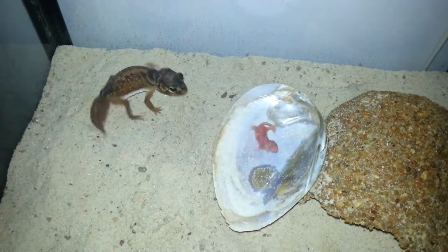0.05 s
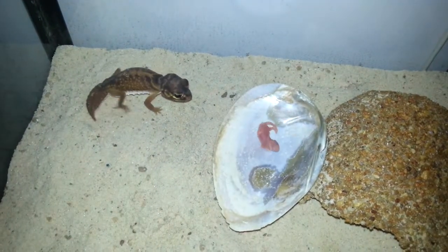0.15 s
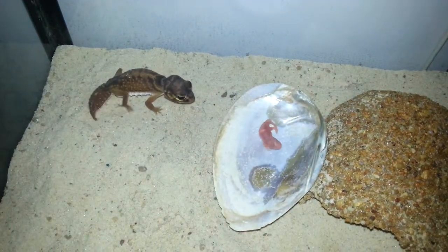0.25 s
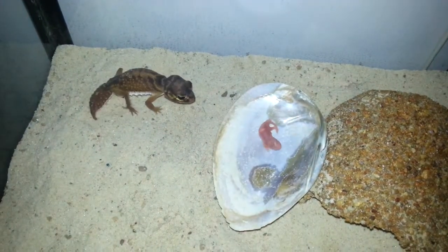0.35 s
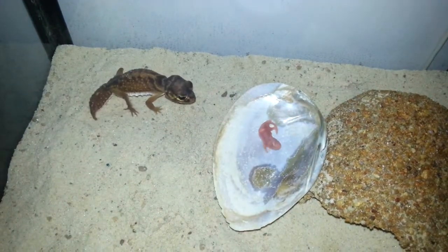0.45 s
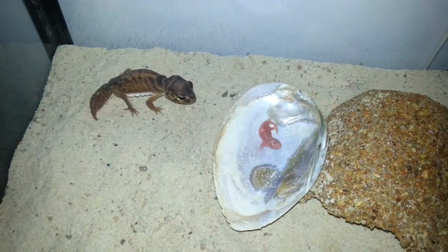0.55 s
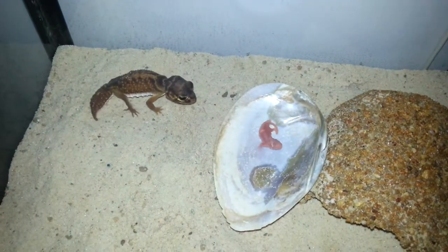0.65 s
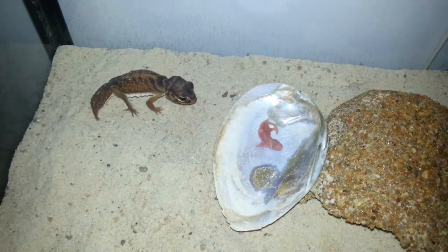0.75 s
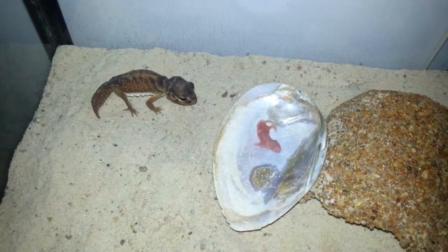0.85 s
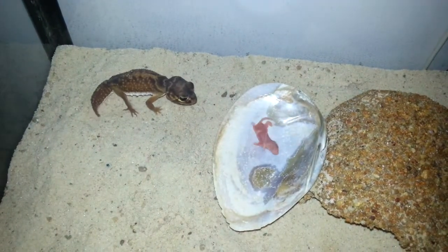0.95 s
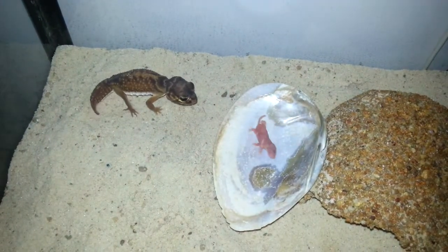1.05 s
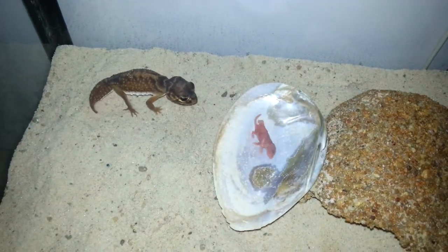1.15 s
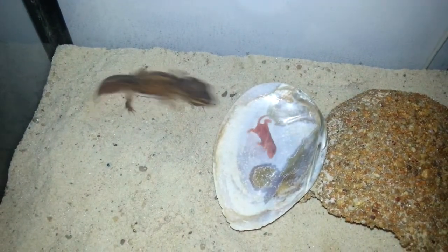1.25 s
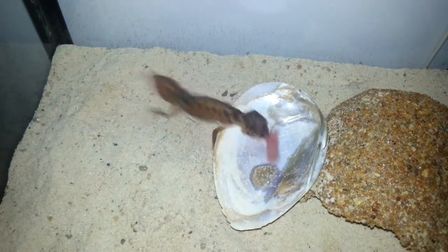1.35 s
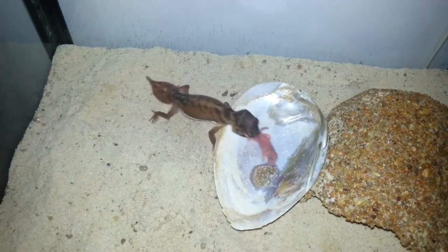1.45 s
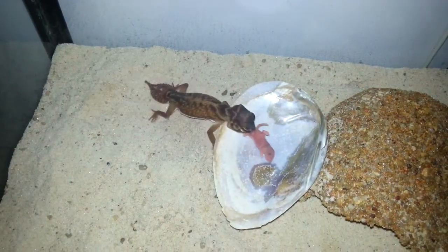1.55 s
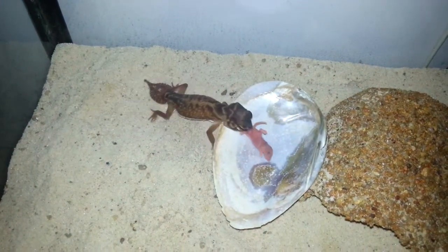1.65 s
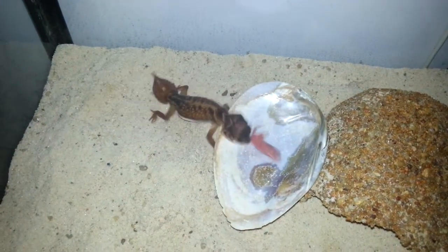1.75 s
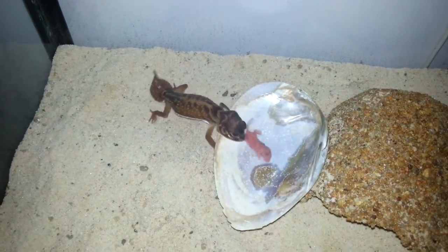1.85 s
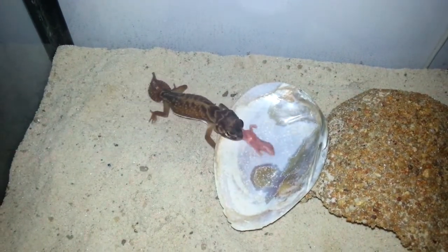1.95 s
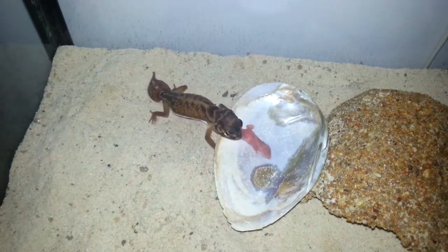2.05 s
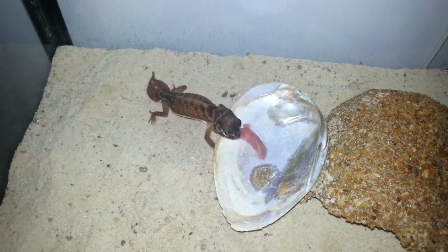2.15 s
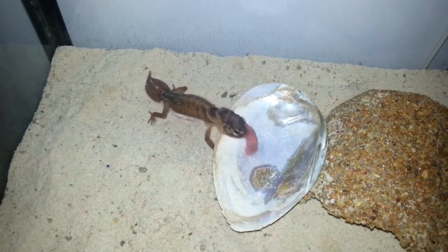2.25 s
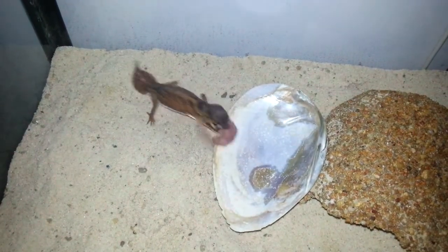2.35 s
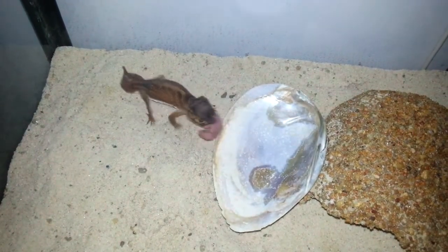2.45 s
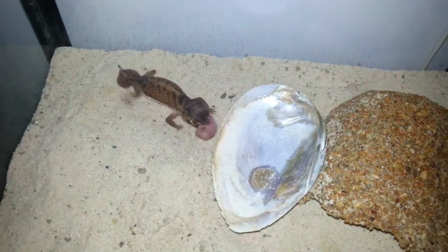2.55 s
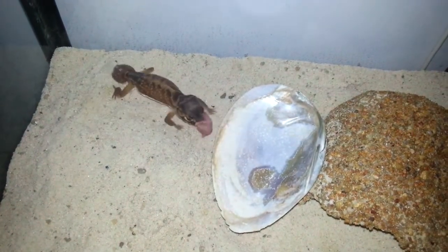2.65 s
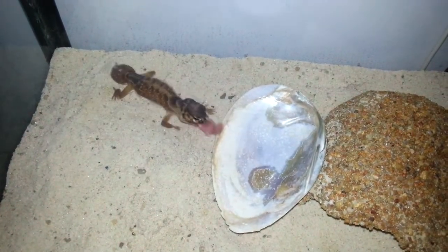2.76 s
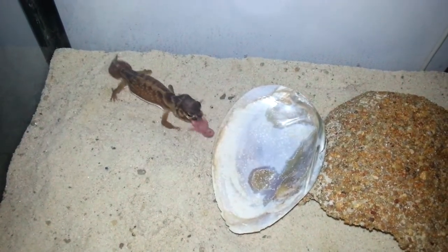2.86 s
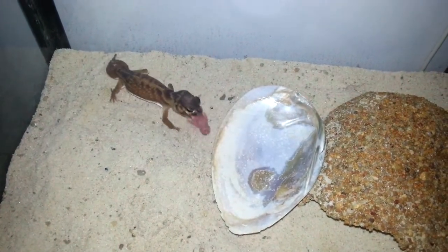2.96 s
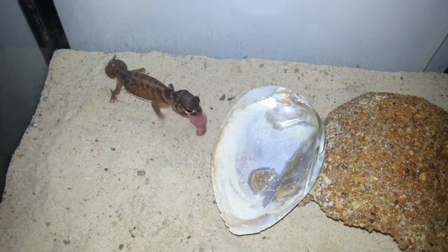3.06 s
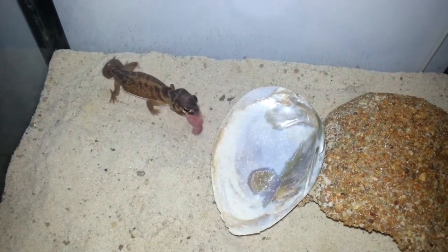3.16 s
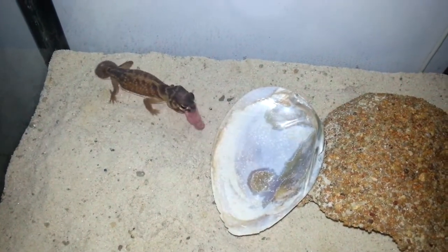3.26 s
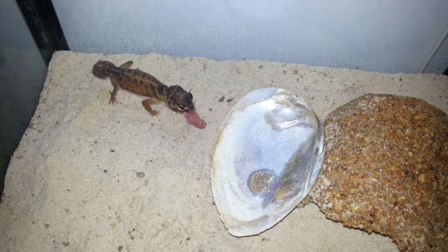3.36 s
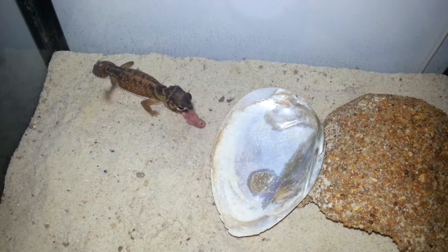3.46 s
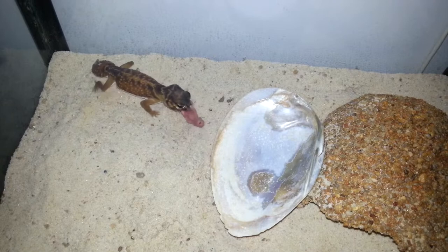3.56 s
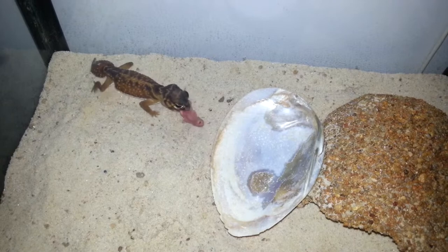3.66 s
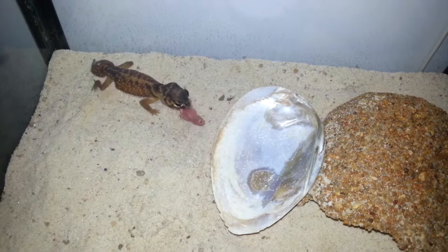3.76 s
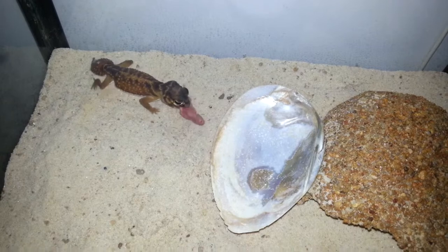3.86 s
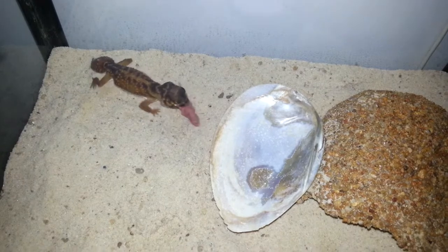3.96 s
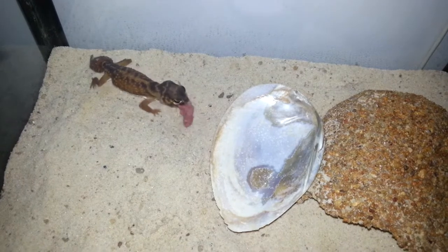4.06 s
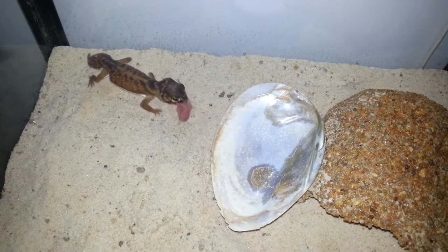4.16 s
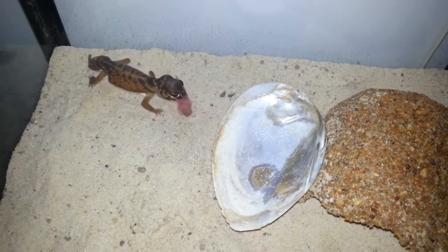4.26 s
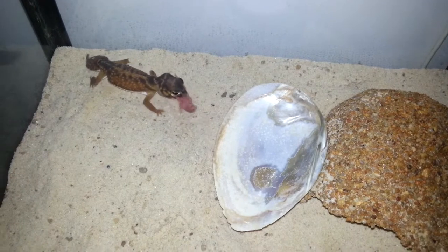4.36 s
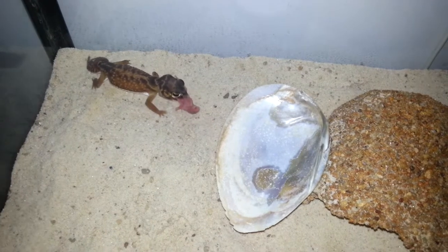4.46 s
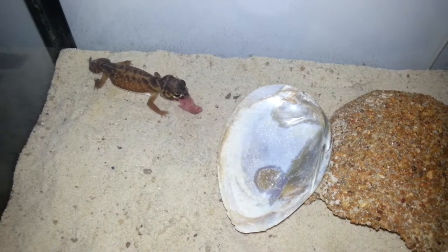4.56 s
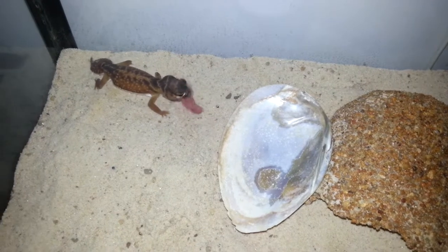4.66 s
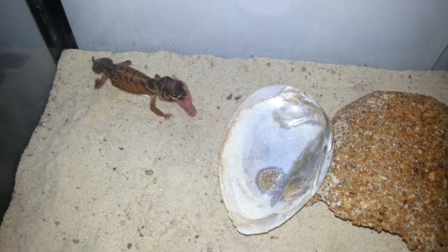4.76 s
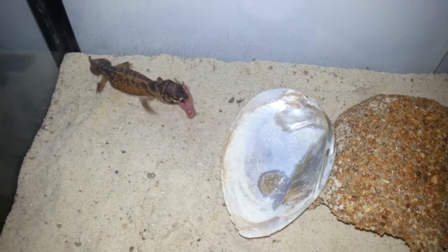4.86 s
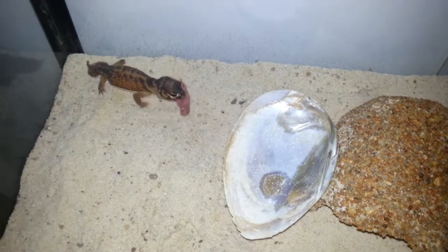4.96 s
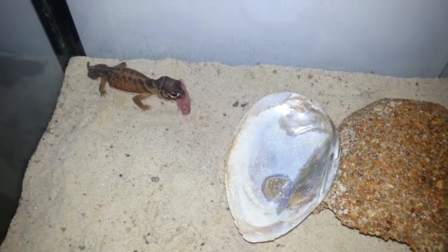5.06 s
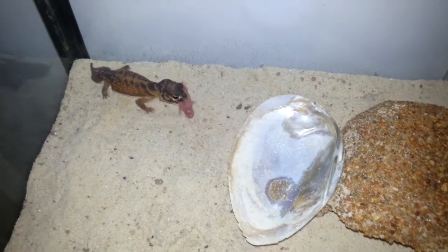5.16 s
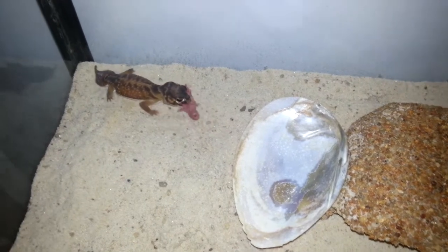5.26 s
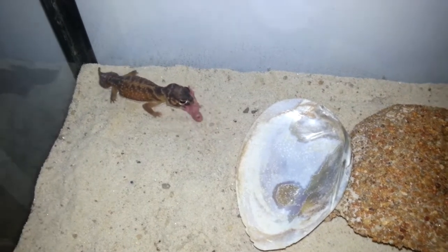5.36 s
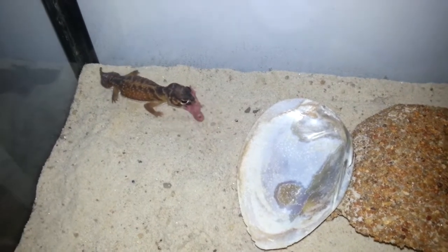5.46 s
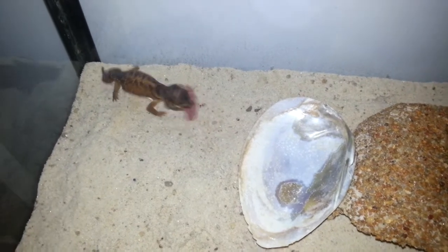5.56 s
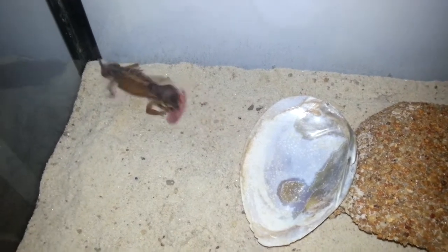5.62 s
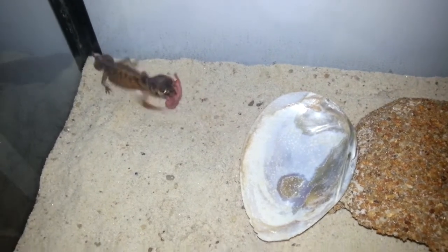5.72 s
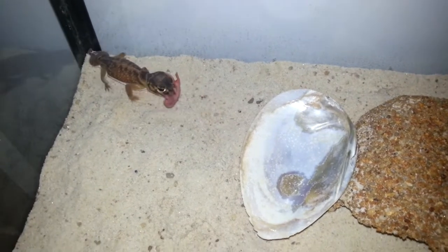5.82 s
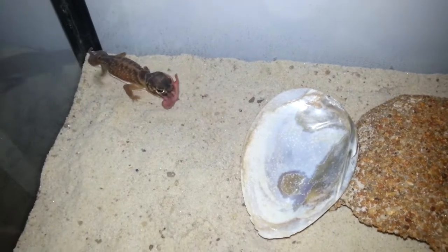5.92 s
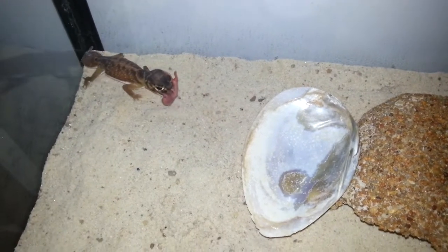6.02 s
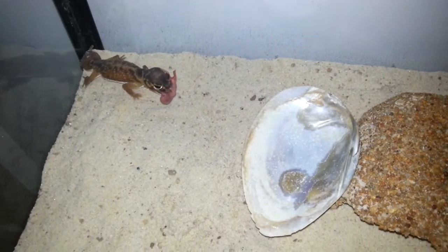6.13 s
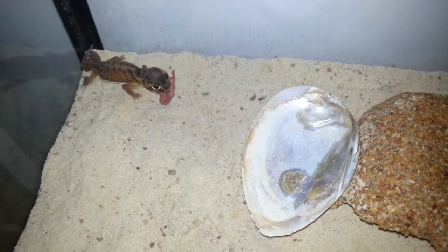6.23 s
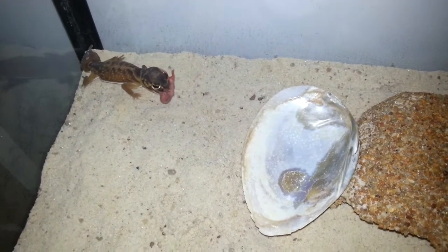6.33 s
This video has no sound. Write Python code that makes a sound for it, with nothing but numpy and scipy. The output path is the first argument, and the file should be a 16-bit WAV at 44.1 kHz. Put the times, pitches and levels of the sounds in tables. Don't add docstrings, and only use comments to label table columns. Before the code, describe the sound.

Hard little taps on a shell and soft floor thumps, then short, piercing, arching squeaks with croaky rasps in a quiet glass tank.

```python
import sys
import numpy as np
from scipy import signal
from scipy.fft import rfft, irfft
from scipy.io import wavfile
from scipy.ndimage import uniform_filter1d, minimum_filter1d

SR = 44100
rng = np.random.default_rng(int(sys.argv[2]) if len(sys.argv) > 2 else 0)


def ratio_of_db(decibels):
    return 10 ** (np.asarray(decibels, float) / 20)


def transcribe(u):
    v = np.clip(np.atleast_2d(u).T, -1, 1)
    q = np.round(v * 32767).astype(np.int16)
    wavfile.write(sys.argv[1], SR, q)


N = 281799
MOUTH_CUT_HZ = 1950


def rms_one(x):
    return x / np.sqrt(np.mean(x ** 2) + 1e-20)


def in_time(rows):
    s, *columns = np.transpose(rows)
    return [np.interp(np.arange(N) / SR, s, c) for c in columns]


def phrases(tables, edge_s):
    t = np.arange(N) / SR
    gate = sum((t >= rows[0][0]) & (t < rows[-1][0]) for rows in tables) > 0
    rows = sorted(row for rows in tables for row in rows)
    return [uniform_filter1d(gate * 1.0, max(1, int(edge_s * SR)))] + in_time(rows)


def wobble(hz):
    r = np.exp(-2 * np.pi * hz / SR)
    noise = rng.standard_normal(N + SR)
    return rms_one(signal.lfilter([1], [1, -2 * r, r * r], noise)[SR:])


def butter(x, order, hz, kind):
    return signal.sosfilt(signal.butter(order, hz, kind, fs=SR, output="sos"), x)


def butter_both_ways(x, hz, kind):
    return signal.sosfiltfilt(signal.butter(4, hz, kind, fs=SR, output="sos"), x)


def colour(x, spectrum):
    hz, level_db = np.transpose(spectrum)
    grid = np.linspace(1, SR / 2, 4097)
    gain = ratio_of_db(np.interp(np.log(grid), np.log(hz), level_db, left=-60, right=-60))
    fold = irfft(np.log(gain))[:4097] * np.r_[1, np.full(4095, 2), 1]
    taps = irfft(np.exp(rfft(fold, 8192)))
    taps = (taps / np.linalg.norm(taps)).reshape((1,) * (x.ndim - 1) + (-1,))
    return signal.oaconvolve(x, taps, axes=-1)[..., :N]


def resonate(x, modes):
    out, power = 0, 0
    for k, (hz, width_hz, level_db) in enumerate(modes):
        r = np.exp(-np.pi * width_hz / SR)
        b = (1 - r * r) / 2 * np.array([1, 0, -1]) * ratio_of_db(level_db) * (-1) ** k
        out = out + signal.lfilter(b, [1, -2 * r * np.cos(2 * np.pi * hz / SR), r * r], x + 1e-18)
        power += ratio_of_db(2 * level_db) * np.pi * width_hz / SR
    return out / np.sqrt(power)


def strikes(times, level_db, spread_s):
    out, shape = np.zeros(N), np.exp(-np.arange(200) / (spread_s * SR))
    bursts = rng.standard_normal((len(times), 200)) * shape
    for s, gain, burst in zip(times, ratio_of_db(level_db), bursts):
        start = round(s * SR)
        out[start:start + 200] += gain * burst / np.linalg.norm(burst)
    return out


# t/s, pitch f/Hz
SQUEAK_PITCHES = [
    [(2.329, 3500), (2.333, 4950), (2.341, 5960), (2.351, 5200), (2.359, 5100), (2.368, 4580),
     (2.378, 4200), (2.39, 3870)],
    [(3.348, 2600), (3.36, 3350), (3.37, 3670), (3.38, 3450), (3.387, 3150), (3.393, 2500), (3.41, 1900),
     (3.427, 1400)],
    [(3.713, 2500), (3.723, 3650), (3.73, 3960), (3.738, 4040), (3.748, 3850), (3.763, 3000)],
    [(4.12, 1800), (4.127, 2250), (4.14, 2640), (4.146, 2450), (4.154, 2200)],
    [(4.593, 2200), (4.603, 3300), (4.612, 3720), (4.624, 3830), (4.636, 3760), (4.641, 3400),
     (4.652, 3250)],
    [(4.761, 2900), (4.766, 3300), (4.772, 3500), (4.773, 4650), (4.789, 4350)],
]
# attack t/s, release t/s, first harmonic level/dB, drift over the hold/dB,
# overtones above the first harmonic level/dB
BREATHS = [(.003, .008, -24, 3, -8), (.003, 0.042, -38, -2, -3.5), (.004, 0.002, -37, -2, -4),
           (.006, 0.0032, -41, -0.5, -3.5), (.007, .006, -36, -0.5, -6), (.005, 0.017, -28, -3, -15.5)]


def whistles():
    tables = []
    for rows, (attack_s, release_s, level_db, drift_db, overtone_db) in zip(SQUEAK_PITCHES, BREATHS):
        s, hz = np.transpose(rows)
        t = np.arange(s[0], s[-1], .001)
        hold_start, hold_end = s[0] + attack_s, s[-1] - release_s
        shape_db = np.interp(t, [s[0], hold_start, hold_end, s[-1]], [-10.5, 0, 0, -13])
        hold_db = np.interp(t, [hold_start, hold_end], [0, drift_db])
        overtones_db = overtone_db - .2 * shape_db + np.linspace(0, -3.5, len(t))
        tables.append(list(zip(t, np.interp(t, s, hz), level_db + hold_db + shape_db, overtones_db)))
    return tables


# f/Hz, level/dB
OVERTONE_PATH = [(3000, 12), (6000, -2.5), (7800, 3.5), (11300, 7), (13000, 3), (14200, 6), (15000, 2),
                 (15400, -32)]


def whistle():
    gate, hz, level_db, overtone_db = phrases(whistles(), edge_s=.001)
    hz = uniform_filter1d(hz, 60) * (1 + .011 * wobble(hz=300))
    phase = 2 * np.pi * np.cumsum(hz) / SR
    out = ratio_of_db(level_db + 2.8 * wobble(hz=250)) * np.sin(phase)
    for k in range(2, 8):
        path_db = np.interp(k * hz, *np.transpose(OVERTONE_PATH), right=-90)
        harmonic_db = level_db + overtone_db - 2.2 * (k - 2) + path_db - 1.5
        out += ratio_of_db(harmonic_db + 3.5 * wobble(hz=250)) * np.sin(k * phase)
    return butter(np.sqrt(2) * gate * out, 4, MOUTH_CUT_HZ, "high")


RASP_STARTS = [2.3285, 2.8185, 3.3475, 3.713, 3.8025, 4.12, 4.593, 4.762]
# hold t/s, fade t/s, bright level/dB, throat part above it level/dB
RASPS = [(0.028, 0.032, -27.5, -17), (0.0053, 0.047, -35.5, -13), (0.066, .07, -35.5, -2),
         (0.011, 0.062, -34, -5.5), (0.047, 0.023, -46.5, -2), (0.024, 0.064, -32.5, -0.5),
         (0.033, 0.081, -30, -2.5), (0.0079, 0.02, -28.5, 0)]


def rasps():
    tables = []
    for s, (hold_s, fade_s, db, throat_db) in zip(RASP_STARTS, RASPS):
        attack_s = min(.002, .9 * hold_s)
        tables.append([(s, db - 3, throat_db - 8.5),
                       (s + attack_s, db, throat_db - 8.5),
                       (s + hold_s, db, throat_db),
                       (s + hold_s + fade_s, db - 27.5, throat_db + 8.5)])
    return tables


# t/s, first gap t/s, peak level/dB, throat part above it level/dB
CREAK_RUNS = [
    (2.5152, 0.014, -30, -16),
    (2.82, .01, -18, -13.5),
    (2.846, 0.0058, -25.5, -19.5),
    (3.057, 0.014, -35, -11.5),
    (3.4637, 0.0057, -31, -10),
    (4.2105, 0.017, -28.5, -6.5),
]
CREAKS_PER_RUN = [1, 1, 6, 3, 2, 2]


def creaks():
    rows = []
    for (s, gap_s, db, throat_db), count in zip(CREAK_RUNS, CREAKS_PER_RUN):
        for k in range(count):
            rows.append((s + gap_s * np.sum(1.13 ** np.arange(k)), db, throat_db))
    return np.array(rows) + rng.normal(0, 1, (len(rows), 1)) * [0, 1, -1]


# f/Hz, width f/Hz, level/dB
THROAT = [(2455, 3500, 12), (3280, 180, 8.5), (4650, 1300, -3.5)]
# f/Hz, level per Hz/dB
BRIGHT = [(6500, -19), (8300, -8), (10500, -10), (12000, -5), (13400, -4), (14250, 7), (15000, -1.5),
          (16200, -7)]


def rasp():
    gate, level_db, throat_db = phrases(rasps(), edge_s=0.00131)
    voiced = phrases(SQUEAK_PITCHES, edge_s=0.011)[0]
    recent_db = -minimum_filter1d(np.where(gate > 0, -level_db, 99), 6001)
    effort = np.clip(3.5 + (level_db - recent_db) / 19.5 + voiced, 0, 1)
    rate_hz = 280 * (2200 / 280) ** effort * ratio_of_db(3.4 * wobble(hz=149.3))
    slaps = np.diff(np.floor(np.cumsum(rate_hz) / SR), prepend=0) * ratio_of_db(rng.normal(0, 4.5, N))
    puffs = signal.lfilter([1], [1, -np.exp(-1 / (.0007 * SR))], slaps) * rng.standard_normal(N)
    puffs = puffs / np.sqrt(uniform_filter1d(puffs ** 2, 800) + 1e-9) * gate * ratio_of_db(level_db)
    s, peak_db, lone_throat_db = np.transpose(creaks())
    lone = strikes(s, peak_db - 0.5, spread_s=0.00099)
    lone_throat = strikes(s, peak_db + lone_throat_db + 10.5, spread_s=0.00026)
    leak = ratio_of_db(-13 * voiced)
    throat = resonate(puffs * leak * ratio_of_db(throat_db) + lone_throat, THROAT)
    bright = colour(puffs * leak ** .3 + lone, BRIGHT)
    return bright + butter(throat, 3, MOUTH_CUT_HZ, "high")


# t/s, peak level/dB, left-right level/dB
SHELL_TAPS = [
    (1.3858, -43.5, 15),
    (1.407, -37, 3),
    (1.42, -18.5, 4),
    (1.7916, -28.5, 15),
    (1.799, -45, 24),
    (2.7695, -34, 4),
    (5.665, -35.5, 3),
    (5.689, -34.5, 0),
]
# t/s, peak level/dB, left-right level/dB
CLAW_TAPS = [(0.1328, -44, 1), (0.3113, -47, 3), (0.6875, -42.5, 4), (0.8113, -45, 3), (1.7763, -44, 5),
             (1.7862, -32, -9), (2.075, -43, 0), (2.9735, -38, 2), (3.9744, -45, 4), (4.025, -45, 2),
             (4.3822, -45.5, 9), (5.068, -44, 2), (5.6208, -38, 2), (5.656, -47, 6)]
# t/s, peak level/dB, left-right level/dB
GLASS_TAPS = [
    (2.482, -44.5, -2.0),
    (5.4185, -47, 1),
    (5.525, -45, 12),
]
# ring level/dB, thud level/dB, tick level/dB
SURFACES = [
    (-2, -36, -18),
    (-4, -6.5, -6),
    (-7, 11.5, -3),
]
# f/Hz, width f/Hz, level/dB
SHELL = [(1690, 97, 3), (2460, 270, 4.5), (3190, 317, 14), (4460, 1600, 5), (5250, 1440, -4)]
# f/Hz, width f/Hz, level/dB
THUD = [(294, 590, -6.5), (730, 780, 1.5), (1400, 1470, 1.5), (1980, 910, 3)]


def taps():
    events = []
    for rows, surface in zip([SHELL_TAPS, CLAW_TAPS, GLASS_TAPS], SURFACES):
        events += [(s, db, *surface, pan_db) for s, db, pan_db in rows]
    s, peak_db, ring_db, thud_db, tick_db, pan_db = np.transpose(sorted(events))
    ring = resonate(strikes(s, peak_db + ring_db + 16, spread_s=.000005), SHELL)
    thud = resonate(strikes(s, peak_db + thud_db + 20, spread_s=.000005), THUD)
    tick = colour(strikes(s, peak_db + tick_db + 14.5, spread_s=0.00087), BRIGHT)
    side_db = np.interp(np.arange(N) / SR, s, pan_db) / 2
    return (ring + thud + tick) * ratio_of_db([side_db, -side_db])


# t/s, rise t/s, fall t/s, level/dB
SHUFFLES = [
    (1.379, 0.048, 0.1, -49),
    (1.77, 0.022, 0.18, -60.5),
    (2.399, .002, 0.038, -46),
    (2.44, 0.072, 0.084, -55),
    (5.57, 0.097, 0.2, -56.5),
]
# f/Hz, level per Hz/dB
SAND = [(100, 36), (300, 19.5), (1000, 13.5), (3500, 11), (6500, 8), (10000, 9.5), (14500, 6), (15300, -35)]


def scuffs():
    swells = [[(s, db - 13), (s + rise_s, db), (s + rise_s + fall_s, db - 13)]
              for s, rise_s, fall_s, db in SHUFFLES]
    gate, level_db = phrases(swells, edge_s=0.025)
    sizes = ratio_of_db(0.39 * np.minimum(rng.exponential(1, N), 5)) * rng.choice([-1, 1], N)
    grains_per_s = 4000 * ratio_of_db(4 * wobble(hz=40))
    grains = sizes * (rng.random(N) < grains_per_s / SR)
    return colour(rms_one(grains), SAND) * gate * ratio_of_db(level_db)


# t/s, level/dB, dish knock above it level/dB
BOOMS = [
    (1.426, -58, -28),
    (1.438, -67, -23),
    (1.795, -69.5, 12.5),
    (2.348, -49, 1.5),
    (2.353, -61.5, 8),
]
# f/Hz, width f/Hz, level/dB
FLOOR_MODES = [(119.6, 5.6, -4.5), (207, 4.7, -2), (260, 55, -11), (420, 53, -6.5)]
# f/Hz, width f/Hz, level/dB
DISH = [(455, 15, 2.5), (858, 49, 0), (1310, 44, -1.5), (1790, 53, -12)]


def booms():
    s, level_db, knock_db = np.transpose(BOOMS)
    push = strikes(s, level_db + 36.5, spread_s=0.0052)
    knock = strikes(s, level_db + knock_db + 33.5, spread_s=0.002)
    return resonate(push, FLOOR_MODES) + resonate(knock, DISH)


def tank(x):
    t = np.arange(SR // 4) / SR
    sparse = rng.random((2, len(t))) < 2500 / SR
    early = rng.standard_normal((2, len(t))) * sparse * ratio_of_db(-60 * t / .03) * (t > .001)
    late = rng.standard_normal((2, len(t))) * ratio_of_db(-60 * t / .18) * (t > .004)
    echoes = np.zeros((2, len(t)))
    for part, db in [(early, -3.5), (late, -15)]:
        echoes += ratio_of_db(db) * part / np.linalg.norm(part, axis=1, keepdims=True)
    left_lag_s = .00081
    echoes[0, round(left_lag_s * SR)] += 1
    echoes[1, 0] += 1
    return signal.oaconvolve(x, echoes / np.linalg.norm(echoes, axis=1, keepdims=True), axes=1)[:, :N]


# f/Hz, level per Hz/dB
ROOM = [(15, -9), (30, -21), (60, -14.5), (125, 1), (165, -5.5), (235, -9), (600, -13), (1500, -19.5),
        (2800, -22), (6200, -28.5), (9000, -26.5), (14500, -26), (15000, -67), (16000, -68)]
# t/s, level/dB
ROOM_DB = [(0.0, -59.5), (1.35, -60.5), (1.6, -58.5), (2.3, -59), (2.97, -57), (3.15, -58.5), (4.82, -57),
           (5.16, -59), (5.52, -58), (6.39, -60.5)]
# f/Hz, likeness (0 to 1)
LIKENESS = [(40, 0.8), (90, 0.52), (180, 0.4), (350, 0.083), (900, 0.01), (3000, 0.018)]
# f/Hz, level/dB
HUM = [(199, -70.5), (401, -76)]


def room():
    mid, side = colour(rng.standard_normal((2, N)), ROOM)
    hz, alike = np.transpose(LIKENESS)
    bins_hz = np.linspace(1, SR / 2, N // 2 + 1)
    alike = np.clip(np.interp(np.log(bins_hz), np.log(hz), alike), 0, 1)
    mid = irfft(rfft(mid) * np.sqrt(1 + alike), N)
    side = irfft(rfft(side) * np.sqrt(1 - alike), N)
    t = np.arange(N) / SR
    hum = sum(ratio_of_db(db + 3 * wobble(hz=4)) * np.sqrt(2) * np.sin(2 * np.pi * hz * t) for hz, db in HUM)
    level_db, = in_time(ROOM_DB)
    return ratio_of_db(level_db + 0.17 * wobble(hz=1.7)) * (mid + side * [[1], [-1]]) + hum


def ducked(x):
    heard = [[row for row in rows if row[1] > .9 * MOUTH_CUT_HZ] for rows in SQUEAK_PITCHES[1:5]]
    voiced = np.roll(phrases(heard, edge_s=0.0072)[0], 300)
    lows = butter_both_ways(x, 2100, "low")
    lows = lows - .85 * butter_both_ways(x, [220, 700], "band")
    return x - lows * (1 - ratio_of_db(-18 * voiced))


def scene():
    voice = whistle() * ratio_of_db([[2.5], [1.0]]) + rasp() * ratio_of_db([[3.5], [4.5]])
    return tank(voice + taps() + ratio_of_db(5.0) * scuffs()) + booms() + ducked(room())


def low_pass(x):
    return signal.sosfilt(signal.butter(12, 16030, fs=SR, output="sos"), x)


def record(dry):
    shelved = signal.sosfilt(signal.ellip(8, .5, 20, 14650, fs=SR, output="sos"), dry)
    mix = signal.sosfilt(signal.cheby2(10, 50, 16200, fs=SR, output="sos"), shelved)
    return low_pass(mix)


dry = scene()
out = record(dry)
transcribe(out)
```